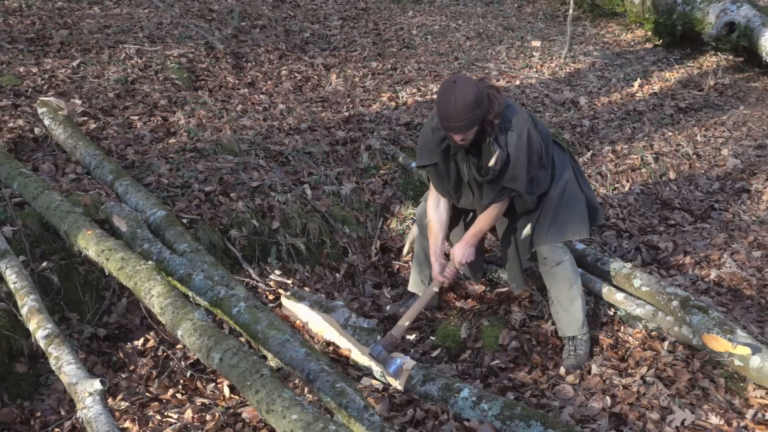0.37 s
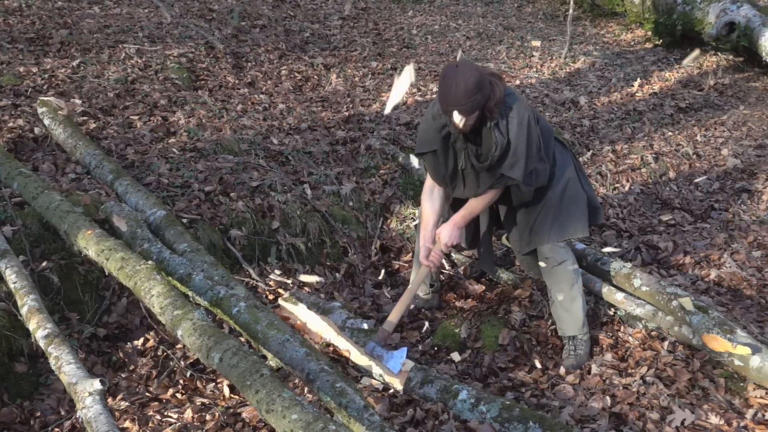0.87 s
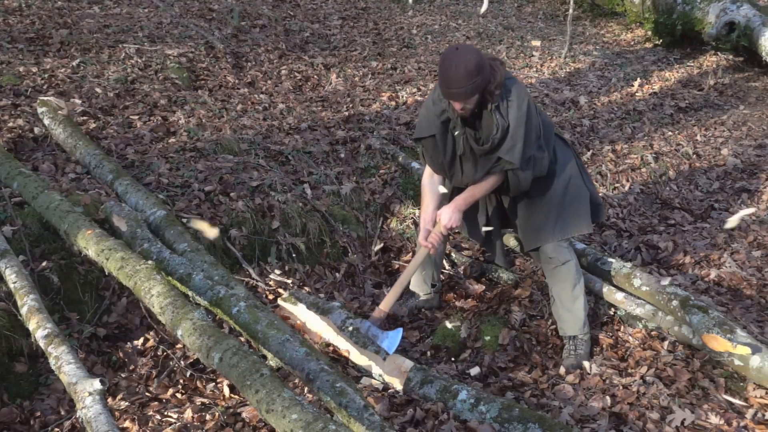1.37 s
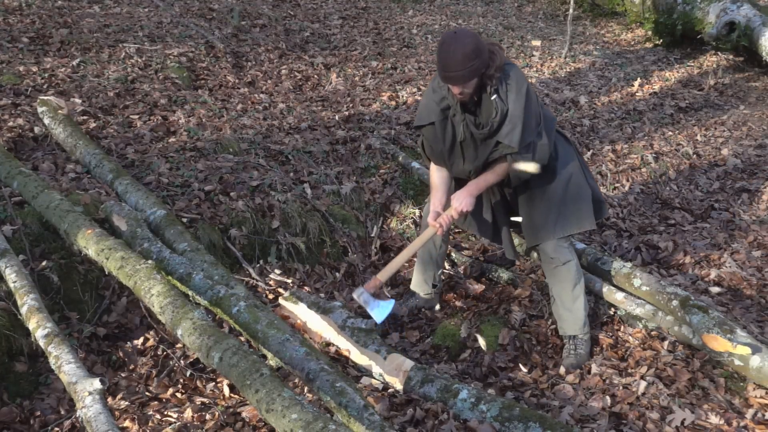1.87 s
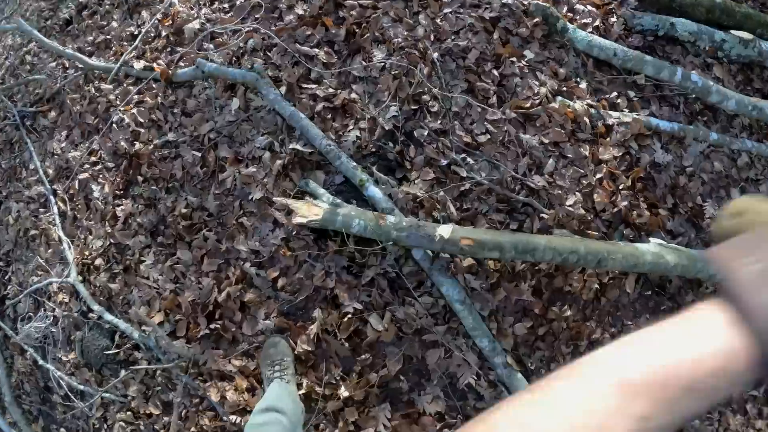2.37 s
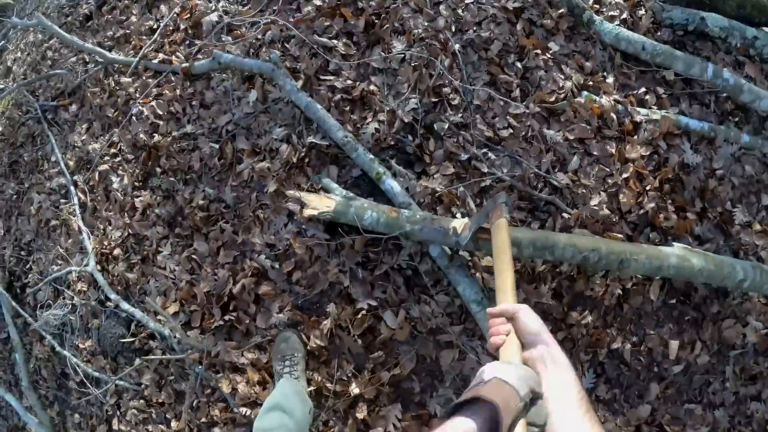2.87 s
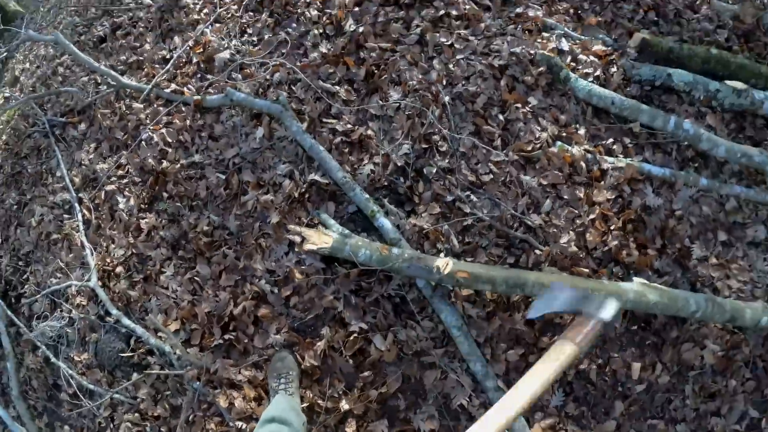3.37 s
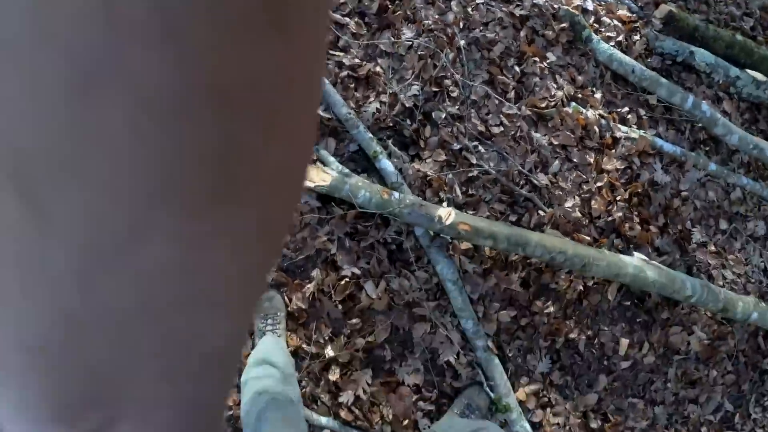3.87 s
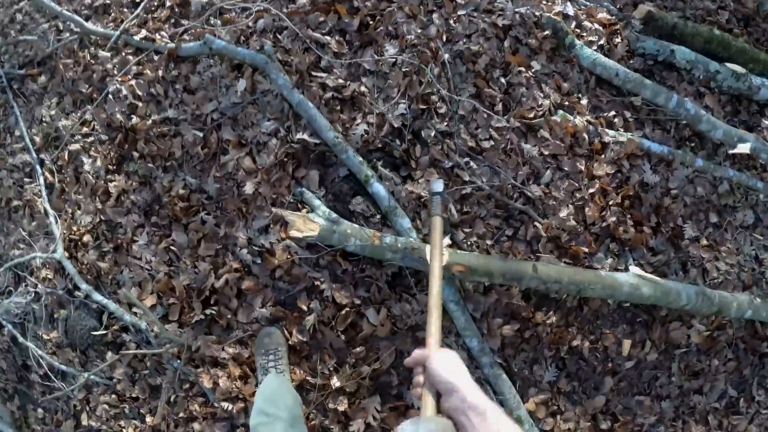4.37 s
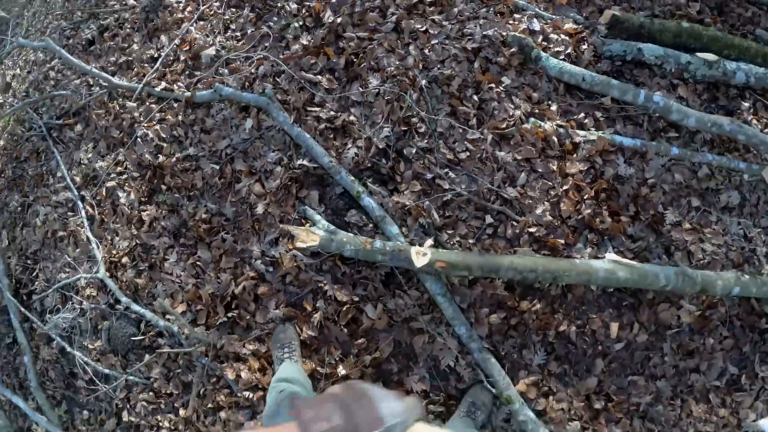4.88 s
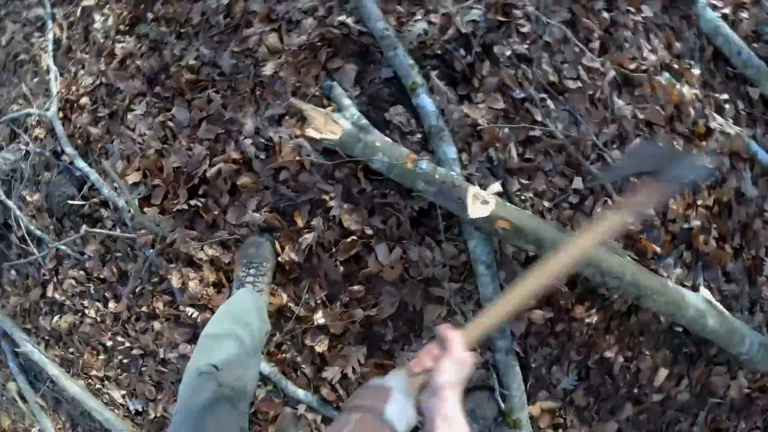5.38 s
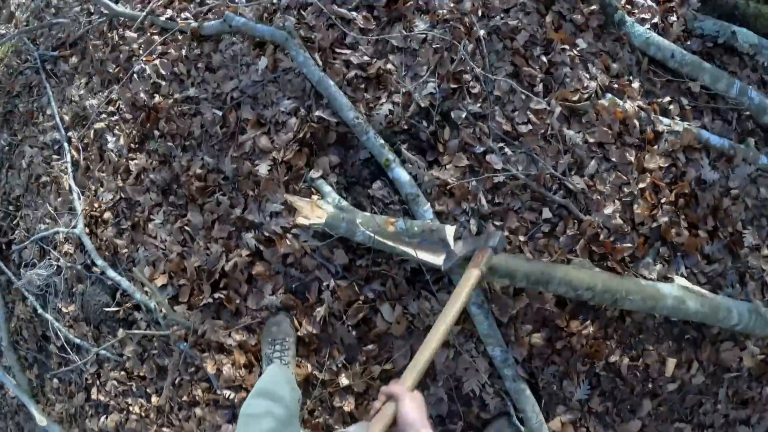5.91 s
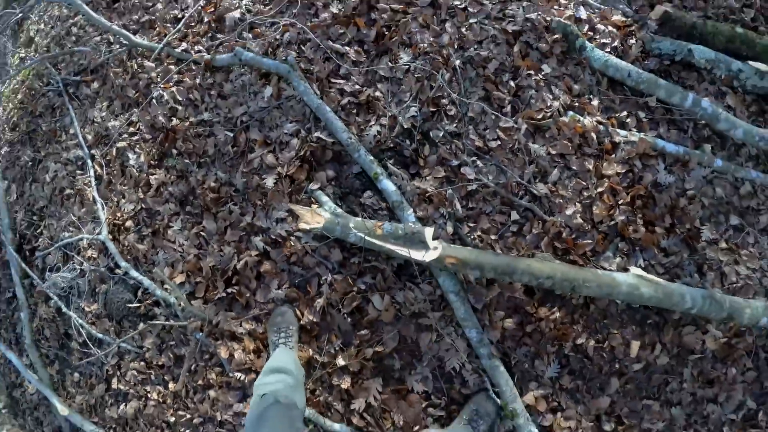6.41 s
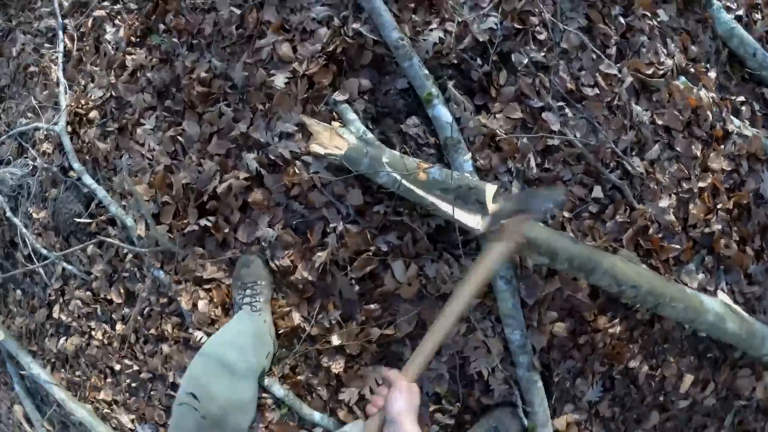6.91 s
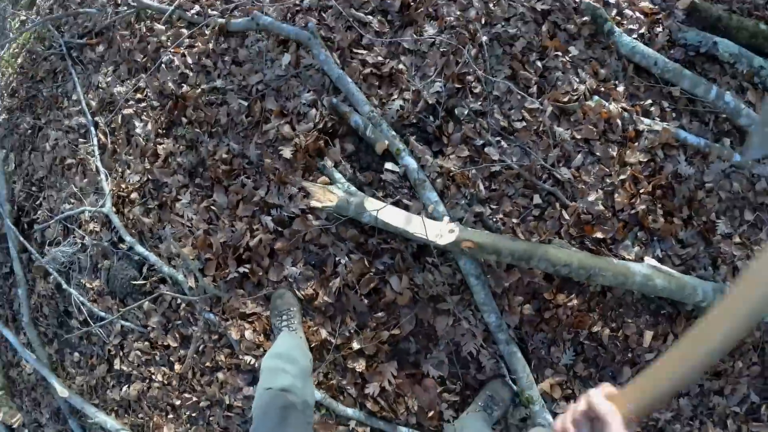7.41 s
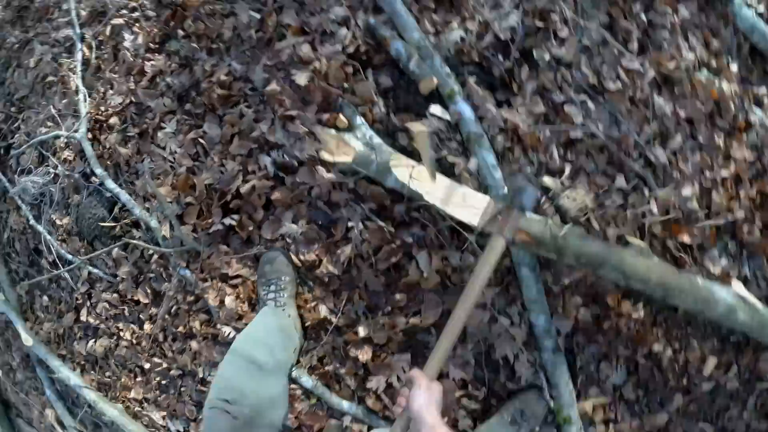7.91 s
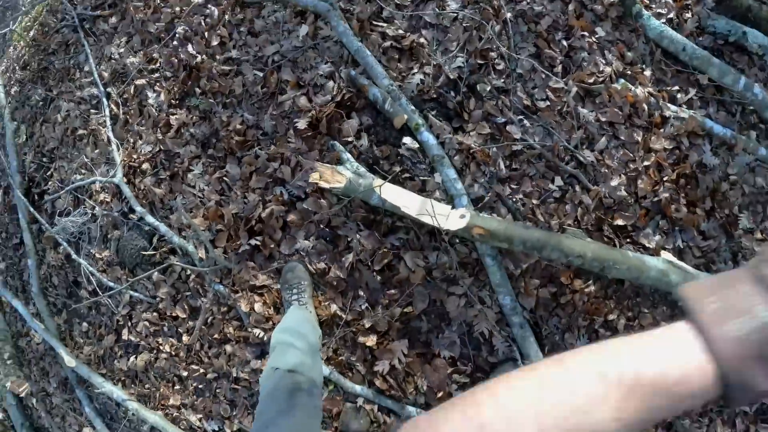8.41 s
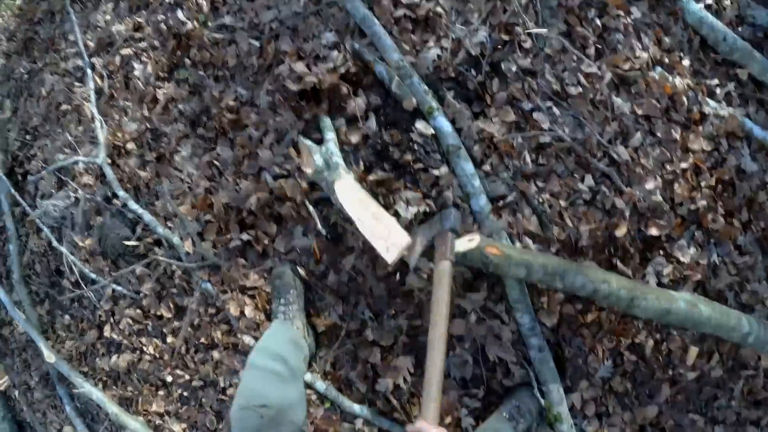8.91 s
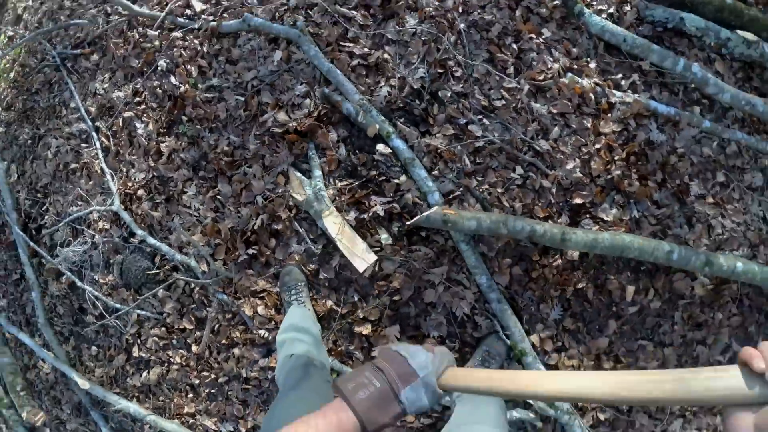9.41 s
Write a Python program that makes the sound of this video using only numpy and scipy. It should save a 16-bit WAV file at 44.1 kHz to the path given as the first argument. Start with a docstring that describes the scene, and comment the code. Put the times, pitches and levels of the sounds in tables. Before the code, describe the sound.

For the first 2.3 seconds a distant microphone hears a faint woodland hush and dry leaves hissing and crackling, slightly left, with tiny chip ticks and weak wooden knocks. A short treble swish leads to a dull, ragged crash at 1.0, dying over less than a second while leaves keep stirring. At 2.3 the perspective switches to a microphone worn by the chopper: a fuller hush, a very thin high whine on the right, and a hard low knock at 2.47. Axe blows land at 2.5, 4.1, 5.4, 6.9, 7.9 and 8.7, each a loud fibrous crack, sinking thud, short hollow log ring and tree echo, clipped by overload. The last is duller and longer, with a strong chip tick and knock just after. Between them come low swing whooshes, cloth rustles, notably at 7.2 and 8.15, wooden knocks, ticks and settling leaves, fading to quiet rustle after 9.4.

```python
"""Leaves hiss and crackle, chips tick and one dull crash rings out, heard by a distant microphone; then six axe
blows crack and thud on a felled log, with swings, knocks and rustling cloth, heard by a worn microphone they overload.
Leaves, cloth, air, crash and echo are shaped noise under decibel envelopes; ticks are puffs through a resonance;
knocks and the log are decaying modes; each blow adds a burst of tearing fibres and a thud of sinking pitch."""
import sys
import numpy as np
from scipy import signal
from scipy.fft import rfft, irfft, next_fast_len
from scipy.io import wavfile

SR = 44100
rng = np.random.default_rng(int(sys.argv[2]) if len(sys.argv) > 2 else 0)


def boost(x):
    """Linear amplitude factor 10**(x/20) for a level x in decibels (scalar or array-like)."""
    u = np.asarray(x, float) / 20
    return 10 ** u


def to_wav(s):
    """Save 16-bit WAV."""
    ch = np.atleast_2d(s).T  # columns
    pcm = np.round(np.clip(ch, -1, 1) * 32767)  # PCM
    wavfile.write(sys.argv[1], SR, pcm.astype(np.int16))


N = 420273
SWITCH_S = 2.283   # the near microphone's surroundings replace the distant ones
FAR_SIZE = round(SWITCH_S * SR)
EVEN_BITE_S = 0.0031   # a bite of this length leaves the log's ring untilted

# axe blows: start_s, crack_db, bite_s, place (along the log, 0-1), ring_factor (multiplies decay times)
BLOWS = [(2.514, 10, 0.0024, .286, 0.98), (4.0700, -1, 0.0049, 0.25, 0.95), (5.403, 8, 0.0045, 0.08, 0.88),
         (6.923, 6.5, 0.0058, .175, 0.88), (7.880, 11, 0.004, .112, 1.04), (8.741, -5.5, 0.01, .424, 1.49)]
# left-right likeness at the distant microphone: frequency_hz, likeness (0-1)
FAR_ALIKE = [(60, 0.3), (240, 1), (950, 0.85), (3770, 0.2), (15000, 0)]
# left-right likeness at the worn microphone: frequency_hz, likeness (0-1)
NEAR_ALIKE = [(60, 0.91), (180, 0.79), (550, 1), (1650, 0.46), (4970, 0.17), (15000, 0.12)]


def rms_one(x):
    """Normalization: scale a signal to unit root-mean-square value."""
    return x / np.sqrt(np.mean(x ** 2) + 1e-20)


def at_hz(points, hz):
    """Logarithmic pitch: read a curve along a log frequency axis."""
    return np.interp(np.log(hz), np.log(np.array(points)[:, 0]), np.array(points)[:, 1])


def drift(rate_hz, size):
    """Low-passed chance: noise through two equal poles wanders slowly with rms near 1."""
    r = np.exp(-80 * np.pi * rate_hz / SR)   # one value per 40 samples
    white = rng.standard_normal(size // 40 + 502)
    slow = rms_one(signal.lfilter([1], [1, -2 * r, r * r], white)[500:])
    return np.interp(np.arange(size) / 40, np.arange(len(slow)), slow)


def coloured(spectrum, alike, size, grain_db=0.):
    """Spectral shaping: grainy stereo noise gets a spectrum and a left-right likeness per pitch; rms 1."""
    fast = next_fast_len(size)
    white = rng.standard_normal((2, fast)) * boost(grain_db * drift(180, fast))
    hz = np.maximum(np.arange(fast // 2 + 1) * SR / fast, 10)
    mid, side = rfft(white) * boost(at_hz(spectrum, hz))
    likeness = np.clip(at_hz(alike, hz), 0, .999)
    both = np.sqrt(1 + likeness) * mid + np.sqrt(1 - likeness) * side * [[1], [-1]]
    return rms_one(irfft(both, fast)[:, :size])


def ring(force, hz, t60_s):
    """Damped resonance: a unit click sets a decaying sine of height 1 ringing."""
    r, w = boost(-60 / (t60_s * SR)), 2 * np.pi * hz / SR
    return signal.lfilter([0, np.sin(w)], [1, -2 * r * np.cos(w), r * r], force + 1e-18)


def dying(t, t60_s):
    """Exponential decay: a gain falls 60 dB in t60_s from t = 0."""
    return boost(-60 * np.maximum(t, 0) / t60_s) * (t >= 0)


def swells(rows, floor_db, quicker=1):
    """Power addition: swells straight in dB, 20 dB per rise or fall time over quicker, sum with a floor."""
    t = np.arange(0, N, 32) / SR
    power = boost(floor_db) ** 2
    for peak_s, db, rise_s, fall_s in rows:
        away = np.maximum((peak_s - t) / rise_s, (t - peak_s) / fall_s)
        power = power + boost(2 * db - 40 * quicker * away)
    return np.interp(np.arange(N) / SR, t, np.sqrt(power))


def add(out, sound, start_s):
    """Superposition: mix a sound in from its start time."""
    i = round(start_s * SR)
    out[..., i:i + sound.shape[-1]] += sound[..., :N - i]


def distant_hush():
    """Stationary noise: a faint hush, slightly stronger on the left, wavers under the distant microphone."""
    # hush spectrum: frequency_hz, relative level_db (per Hz)
    hush_spectrum = [(59, -95), (100, -60), (295, -17.5), (784, -0.5), (872, -9.5), (970, -2.5), (1800, -4),
                     (7610, -24.5), (14400, -19.5), (16000, -40)]
    gain = boost(-50 + 0.29 * drift(12, FAR_SIZE))
    return gain * coloured(hush_spectrum, FAR_ALIKE, FAR_SIZE, grain_db=0.6) * boost([[.6], [-.6]])


def woodland_hush():
    """Stationary noise: the diffuse hush of the wood is shaped noise with a slow waver."""
    # hush spectrum: frequency_hz, relative level_db (per Hz)
    wood_spectrum = [(35, -58), (60, -25.5), (368, 1.5), (413, 0.5), (1070, -3.5), (1520, -15.5),
                     (1870, -13.5), (2250, -16), (2650, -13), (4030, -20), (6260, -23.5), (7200, -21.5),
                     (14100, -23), (15500, -21.5)]
    return boost(-48.5 + 0.45 * drift(3.5, N)) * coloured(wood_spectrum, NEAR_ALIKE, N, grain_db=1.7)


def electric_whine():
    """Pure tone: a thin electric whine is one steady sine, far stronger on the right; levels are rms."""
    tone = np.sqrt(2) * np.sin(2 * np.pi * 15704 * np.arange(N) / SR)
    return tone * boost([[-81], [-55.5]])


def distant_leaves():
    """Band-wise envelopes: stirred leaves are mid and treble noise whose treble swells more steeply."""
    # stirrings: peak_s, level_db, rise_s, fall_s (both per 20 dB in the mid band), treble_db (over the mid)
    sweeps = [(.02, -47, 0.14, 0.81, -10), (.26, -54, 0.74, 0.093, -0.5), (.51, -50.5, 0.47, .8, -3),
              (.96, -52.5, 0.055, 0.12, 13), (1.03, -41, 0.03, 0.49, -6), (1.25, -53.5, 0.94, 0.22, -1),
              (1.46, -41.5, 0.072, 0.48, -4.5), (1.611, -38.5, 0.02, 0.081, 6.5),
              (1.83, -45.5, .6, 0.12, -4.5), (2.04, -42.5, 0.24, 0.37, -1.6)]
    # mid-band leaf noise: frequency_hz, relative level_db (per Hz)
    mid_spectrum = [(530, -47), (900, -9), (981, -3), (1130, -20), (2120, 0.5), (2460, 0), (2560, 0),
                    (4260, -5), (7000, -27.5), (9100, -38), (15400, -120)]
    # treble leaf noise: frequency_hz, relative level_db (per Hz)
    high_spectrum = [(2350, -32), (4000, -3.5), (7840, -5), (13100, -18), (15400, -18), (16000, -40)]
    high_rows = [(s, db + treble_db, rise, fall) for s, db, rise, fall, treble_db in sweeps]
    mid = swells([row[:4] for row in sweeps], -71)[:FAR_SIZE]
    high = swells(high_rows, -80, quicker=1.39)[:FAR_SIZE]
    # a faint tone in the late rustle, from 1.6 s
    whistle = rms_one(ring(rng.standard_normal(FAR_SIZE), 2240, 0.036)) * (np.arange(FAR_SIZE) > 1.6 * SR)
    return (mid * coloured(mid_spectrum, FAR_ALIKE, FAR_SIZE, grain_db=1.5)
            + high * coloured(high_spectrum, FAR_ALIKE, FAR_SIZE, grain_db=2.5)
            + boost(-14.5) * mid * whistle)


def swish(t):
    """Gaussian swell: a treble swish grows out of a weak step and stops at the crash, t = 0."""
    # swish spectrum: frequency_hz, relative level_db (per Hz)
    swish_spectrum = [(1760, -40), (3000, -8), (4030, -26), (4600, -1), (6040, -23), (6860, -9),
                      (12400, 0.5), (16000, -21)]
    swell = np.exp(-((t + 0.048) / 0.057) ** 2) + 0.19 * (t > -.25)
    return boost(-40) * (t < 0) * swell * coloured(swish_spectrum, FAR_ALIKE, FAR_SIZE)


def crash(t):
    """Reverberant decay: dull noise starts at t = 0, surges 35 ms later and dies raggedly."""
    # crash spectrum: frequency_hz, relative level_db (per Hz)
    crash_spectrum = [(35, -75), (60, -38), (202, -29), (239, -12), (396, -14.5), (590, -6.5), (897, -7.5),
                      (1060, -2.5), (3500, -17.5), (9000, -57), (11700, -66), (19800, -120)]
    ragged = boost(-25 + 2.0 * drift(57, FAR_SIZE)) * dying(t, 0.82)
    surge = 0.78 + 0.41 * np.exp(-((t - .035) / 0.0071) ** 2)
    return ragged * surge * coloured(crash_spectrum, FAR_ALIKE, FAR_SIZE, grain_db=-0.5)


def distant():
    """Filtering and panning: high-passed leaves and swish lean left; the crash and hush join them."""
    t = np.arange(FAR_SIZE) / SR - 1.019   # time from the crash
    leaves = distant_leaves() + swish(t)
    leaves = signal.sosfilt(signal.butter(4, 430, "high", fs=SR, output="sos"), leaves)
    out = leaves * boost([[6.5 / 2], [-6.5 / 2]]) + distant_hush() + crash(t)
    return np.pad(out, ((0, 0), (0, N - FAR_SIZE)))


def rustling():
    """Friction noise: cloth and leaves rustle in treble swells, and leaves settle after every blow."""
    # rustles: peak_s, level_db, rise_s, fall_s (both per 20 dB)
    rustles = [(3.02, -56.5, 1.4, .15), (3.64, -52, .06, .1), (3.704, -42, .01, .018),
               (3.9, -53, .04, 0.096), (4.42, -51.5, .006, 0.72), (4.744, -47.5, .016, 0.022),
               (4.922, -45, .024, .1), (5.054, -41, 0.073, .17), (5.336, -42.5, 0.011, 0.028),
               (5.75, -48.5, .023, .06), (5.946, -38, 0.013, 0.043), (5.95, -52, 0.27, .2),
               (6.36, -53.5, 0.071, .06), (6.58, -45.5, 0.31, .045), (6.73, -53.5, 0.044, .015),
               (7.222, -36, .06, .06), (7.3, -57, .3, .2), (8.156, -31.5, 0.014, 0.088),
               (8.268, -41.5, 0.13, 0.028), (8.36, -45.5, 0.16, 0.26), (8.692, -51, 0.011, .09),
               (9.036, -41.5, 0.25, 0.057), (9.07, -50.5, 0.054, .36), (9.274, -52, 0.018, 0.028),
               (9.414, -42, 0.0091, 0.018), (9.4, -54.5, .6, 0.49)]
    # rustle spectrum: frequency_hz, relative level_db (per Hz)
    cloth_spectrum = [(900, -22.5), (1800, 7), (2600, 4.5), (3300, 9.5), (4200, 2), (7500, 4.5),
                      (12000, 3.5), (15000, 2), (16500, -10)]
    settling = [(s, -31, .001, 0.12) for s, *_ in BLOWS]
    return swells(rustles + settling, -69) * coloured(cloth_spectrum, NEAR_ALIKE, N, grain_db=2.5)


def moving_air():
    """Turbulence noise: arm and axe push lumpy low-pitched air at the ports; the swing peaks at every blow."""
    # gusts: peak_s, level_db, rise_s, fall_s (both per 20 dB)
    gusts = [(2.32, -50, .06, 0.16), (3.298, -41.5, .05, 0.025), (3.82, -37.5, .045, 0.2),
             (3.93, -41, .3, 0.066), (5.19, -44.5, .05, .4), (5.34, -42, .4, .1), (6.01, -54, .2, .2),
             (6.62, -54.5, .5, 0.24), (6.84, -40, .045, 0.52), (7.13, -56, .1, 0.22),
             (7.72, -47.5, .11, 0.59), (8.17, -50, .3, 0.14), (8.545, -55, .06, .3),
             (8.97, -44.5, .3, 0.16)]
    swings = [(s, -39, 0.17, 0.26) for s, *_ in BLOWS]
    lump_spectrum = [(30, -7.5), (70, -17.0), (170, -2.5), (260, -0.5), (450, -12.5), (900, -24.5), (1500, -65.5)]
    lumps = coloured(lump_spectrum, [(30, 0.88), (500, 0.97)], N)
    return swells(gusts + swings, -61) * boost(2.0 * drift(23, N)) * lumps


def jolts():
    """Impulsive excitation: each blow shakes the worn microphone, a decaying low rumble."""
    gain = boost(-25) * sum(dying(np.arange(N) / SR - s, 0.11) for s, *_ in BLOWS)
    return gain * coloured([(30, -2), (60, 0.5), (160, 0), (300, -19), (600, -50)], [(30, .6), (200, .3)], N)


def near_air():
    """Superposition: hush, whine, rustle, air and jolts surround the worn microphone from the switch on."""
    near = woodland_hush() + electric_whine() + rustling() + moving_air() + jolts()
    return near * (np.arange(N) > SWITCH_S * SR)


def ticks():
    """Broad resonance: chips and twigs tick in the leaves, short noise puffs through a low-Q resonator."""
    # ticks: start_s, level_db (peak before panning and ports), pitch_hz, pan_db (left over right)
    tick_rows = [(0.0995, -33, 2370, 2), (0.2045, -26.5, 4800, 6), (0.2226, -31, 2970, 2),
                 (0.2369, -35, 2430, 3), (0.257, -28, 4830, 8.5), (0.382, -31, 4500, 9),
                 (1.1019, -27, 3500, 0), (1.1517, -29.5, 2810, 1), (1.6116, -27, 3700, 18),
                 (1.7039, -27, 2240, 3), (1.937, -37, 2660, -1), (3.009, -31.5, 2650, -10),
                 (3.2051, -37, 8220, -1.0), (3.7, -27.5, 3180, 1), (4.401, -32, 7700, -15),
                 (4.4209, -34, 6680, 3), (4.4644, -31.5, 2990, 2), (4.518, -30, 8100, -7),
                 (4.5703, -32, 2460, -10), (4.7381, -40, 12300, -1.5), (4.9092, -39.5, 3370, 2.5),
                 (4.9257, -30.5, 8900, -4), (5.0467, -25.5, 3030, -0.5), (5.3357, -39, 3400, 3),
                 (5.942, -31, 12200, -3), (6.427, -35, 3040, -0.5), (6.5, -33.5, 3220, 1),
                 (6.5797, -33.5, 2500, -7), (6.7655, -29, 3100, 1.5), (7.215, -19, 3100, 0),
                 (8.157, -25, 3620, 2), (8.266, -32.5, 10400, -1), (8.764, -11.5, 2300, -3),
                 (8.925, -29.5, 3055, 4), (9.124, -33.5, 3080, -2), (9.426, -33.5, 3540, -2),
                 (9.4798, -35, 3500, 2)]
    out, t = np.zeros((2, N)), np.arange(2000) / SR
    puffs = np.diff(rng.standard_normal((len(tick_rows), 2001))) * dying(t, 0.022)
    for (s, db, hz, pan_db), puff in zip(tick_rows, puffs):
        tick = rms_one(ring(puff, hz, 12.0 / hz)) + 0.87 * rms_one(puff)
        add(out, boost(db) * tick / abs(tick).max() * boost([[pan_db / 2], [-pan_db / 2]]), s)
    return out


def knocks():
    """Modal excitation: a rounded push rings two brief wood modes; the rough share is wide-band bark scuffing."""
    # knocks of wood on wood or ground: start_s, level_db, pitch_hz, t60_s, roughness (0-1)
    knock_rows = [(0.084, -29.5, 906, 0.13, 0.7), (0.381, -31.5, 950, 0.038, 0.5),
                  (0.562, -33, 694, 0.06, 0.6), (0.621, -31, 900, 0.071, 0.68),
                  (0.739, -35.5, 634, 0.055, 0.47), (2.411, -27, 200, 0.06, 0.36),
                  (2.463, -23, 760, 0.05, 0.4), (2.471, -5, 232, 0.14, 0.51),
                  (2.718, -27.5, 293, 0.072, 0.1), (3.28, -12.5, 310, 0.032, 0.46),
                  (3.306, -30, 433, 0.05, 0), (3.605, -26, 408, 0.059, 0.46),
                  (4.032, -24, 340, 0.043, 0.83), (4.988, -26, 710, 0.043, 0.42),
                  (5.095, -26, 400, 0.039, 0.05), (5.499, -19.5, 387, 0.076, 0.1),
                  (5.542, -16, 527, 0.043, 0.4), (5.59, -13, 333, 0.043, 0.44),
                  (6.006, -23, 510, 0.068, 0.48), (6.179, -34.5, 556, 0.05, 0.45),
                  (6.864, -24.5, 577, 0.025, 0.2), (7.153, -16, 559, 0.1, 0.42),
                  (7.238, -23.5, 336, 0.064, 0.7), (7.992, -16, 442, 0.11, 0.3),
                  (8.149, -27.5, 564, 0.064, 0.77), (8.321, -32.5, 1037, 0.044, 0.15),
                  (8.84, -7.5, 250, 0.095, 0.62)]
    out, t = np.zeros(N), np.arange(8000) / SR
    noise = rng.standard_normal((len(knock_rows), 8000))
    for (s, db, hz, t60_s, rough), white in zip(knock_rows, noise):
        force = np.exp(-((t * hz - .3) / 0.23) ** 2)   # the push lasts about a third of a cycle
        modes = ring(force, hz, t60_s) + 0.35 * ring(force, 1.6 * hz, 0.39 * t60_s)
        modes = modes / abs(modes).max() * np.clip(t * hz / 1.37, .3, 1)
        band = signal.butter(2, [0.64 * hz, 1.65 * hz], "band", fs=SR, output="sos")
        scuff = rms_one(signal.sosfilt(band, white)) * dying(t, t60_s) * np.clip(t * hz / 0.85, 0, 1)
        add(out, boost(db) * ((1 - rough) * modes + 0.57 * rough * scuff), s)
    return out


def tree_echo(out, start_s):
    """Diffuse reflection: the trees return noise with a quick early and a slow late decay."""
    # echo spectrum: frequency_hz, relative level_db (per Hz)
    echo_spectrum = [(35, -79), (60, -36.5), (183, -24.5), (220, -16.5), (253, -15), (376, -13), (413, -6),
                     (613, -8.5), (910, -13), (1420, -27.5), (3050, -21), (4320, -31), (15500, -43)]
    t = np.arange(SR) / SR
    decay = np.clip(t / 0.03, 0, 1) * (dying(t, 0.17) + boost(-13) * dying(t, 1.68))
    add(out, boost(-20.5) * decay * coloured(echo_spectrum, NEAR_ALIKE, SR, grain_db=1.2), start_s)


def log_ring(out, start_s, bite_s, place, ring_factor, push_s):
    """Modal synthesis: a blow excites each mode of the log according to its shape at the landing place."""
    # log modes: pitch_hz, level_db (before place and bite weighting), t60_s (before ring_factor)
    log_modes = [(193.5, -18.5, 0.2), (261.3, -13, 0.16), (324.9, -10, 0.26), (419, 3.4, 0.072),
                 (461, -16, 0.21), (498.7, 2.8, 0.057), (590, 9, 0.021), (622, -15.5, 0.16),
                 (677.5, -0.5, 0.1), (780, -11, 0.042), (871, -9.5, 0.072), (1031, 3, 0.028),
                 (1377, -15.5, 0.012), (1898, -7.5, 0.022), (2500, -32.5, 0.043), (2850, -35, 0.038)]
    t = np.arange(SR // 2) / SR
    # the log shudders on its supports
    rattle = boost(-35.5 + 2 * drift(35, len(t))) * rng.standard_normal(len(t)) * dying(t, 0.18 * ring_factor)
    # mode n has n humps along the log; struck on a node it still rings a little
    shape = abs(np.sin(np.pi * place * np.arange(1, len(log_modes) + 1))) + 0.25
    tilt_db = 1100 * (bite_s - EVEN_BITE_S)   # per octave: a longer bite tilts the ring up
    chances = rng.random((len(log_modes), 2))
    for (hz, db, t60_s), stirred, (delay, sign) in zip(log_modes, shape, chances):
        jolt = np.sign(sign - .5) * (np.arange(len(t)) == 0)
        force = jolt + np.roll(rattle, round(delay * 200)) / (1 + (hz / 800) ** 4)
        gain = stirred * boost(db + tilt_db * np.log2(hz / 500))
        # each mode takes its jolt at its own moment of the bite
        add(out, gain * ring(force, hz, t60_s * ring_factor), start_s + .67 * delay * push_s)


def blade_thud(out, start_s, bite_s, push_s):
    """Frequency modulation: the wedging blade gives one short push whose jittering pitch sinks."""
    t = np.arange(SR // 2) / SR
    to_hz = 587 + 13900 * (bite_s - EVEN_BITE_S)   # a longer bite keeps the thud higher
    jitter = np.clip(rms_one(signal.lfilter([1], [1, -.96], rng.standard_normal(len(t)))), -2, 2)
    thud_hz = (to_hz + (900 - to_hz) * dying(t, 0.0588)) * (1 + 0.169 * jitter)
    push = np.clip(t / 0.00063, 0, 1) * np.clip(1 - t / push_s, 0, 1) ** 0.79
    add(out, -boost(10) * push * np.sin(2 * np.pi * np.cumsum(thud_hz) / SR), start_s)


def fibre_crack(out, start_s, crack_db, bite_s):
    """Fracture noise: fibres tear in grainy noise, held for the bite and then dying in two stages."""
    # tearing spectrum: frequency_hz, relative level_db (per Hz)
    fibre_spectrum = [(500, -25), (1500, -1.5), (3000, 13), (5000, 0), (7000, 2), (11000, -9), (16000, -18)]
    alike = [(500, 1.0), (2500, 0.98), (5000, 0.58), (16000, 0.27)]
    t = np.arange(SR) / SR
    decay = (t < bite_s) + dying(t - bite_s, 0.012) + boost(-11.0) * dying(t, 0.041)
    tearing = np.clip(t / 0.00036, 0, 1) ** 2 * decay
    add(out, boost(crack_db) * tearing * coloured(fibre_spectrum, alike, SR, grain_db=7.5), start_s)
    # the edge parts the bark first, for 150 samples
    bark = np.linspace(.1, 1, 150) * coloured(fibre_spectrum, NEAR_ALIKE, 150)
    add(out, boost(crack_db - 35) * bark, start_s - 150 / SR)


def blows():
    """Impact sequence: fibres crack, then the blade thuds and the log rings, and the trees echo."""
    out = np.zeros((2, N))
    push_s, lag_s = .0163, 0.001203   # length of the blade's push, and its lag behind the crack
    for s, crack_db, bite_s, place, ring_factor in BLOWS:
        tree_echo(out, s)
        log_ring(out, s + lag_s, bite_s, place, ring_factor, push_s)
        blade_thud(out, s + lag_s, bite_s, push_s)
        fibre_crack(out, s, crack_db, bite_s)
    return out


def scene():
    """Interaural delay: work a little to the right reaches the left port later; small ports lose its bass."""
    work = blows() + knocks() + ticks()
    work[0] = np.roll(work[0], 4)   # samples
    work = signal.sosfilt(signal.butter(2, 110, "high", fs=SR, output="sos"), work)
    return work + distant() + near_air()


def band_limit(x):
    """A steep low-pass at the top of the band."""
    return signal.sosfilt(signal.butter(12, 16430, fs=SR, output="sos"), x)


def record(dry):
    """Amplitude clipping: the input stage overloads with flat tops; its coupling blocks the deepest bass."""
    flat = np.clip(dry, -.94, .94)
    coupled = signal.sosfilt(signal.butter(1, 45, "high", fs=SR, output="sos"), flat)
    return band_limit(coupled)


dry = scene()
out = record(dry)
to_wav(out)
```